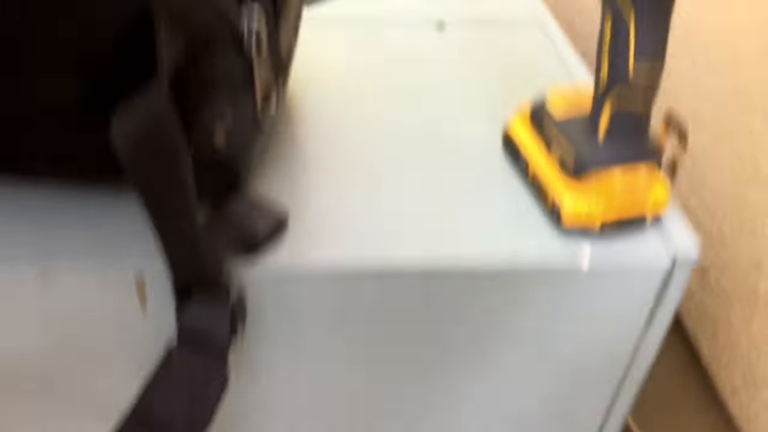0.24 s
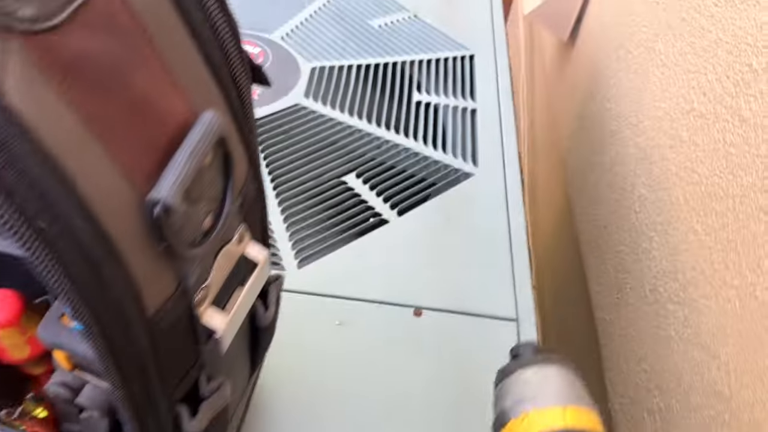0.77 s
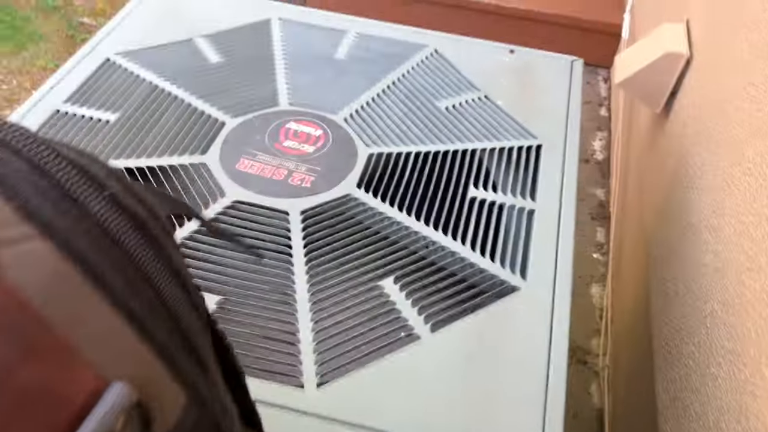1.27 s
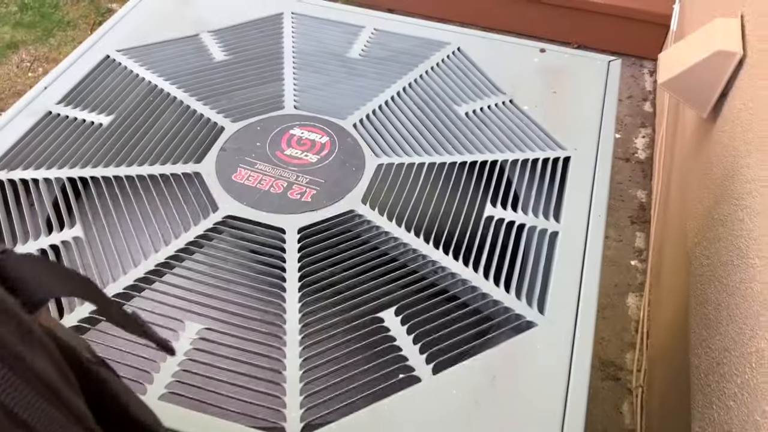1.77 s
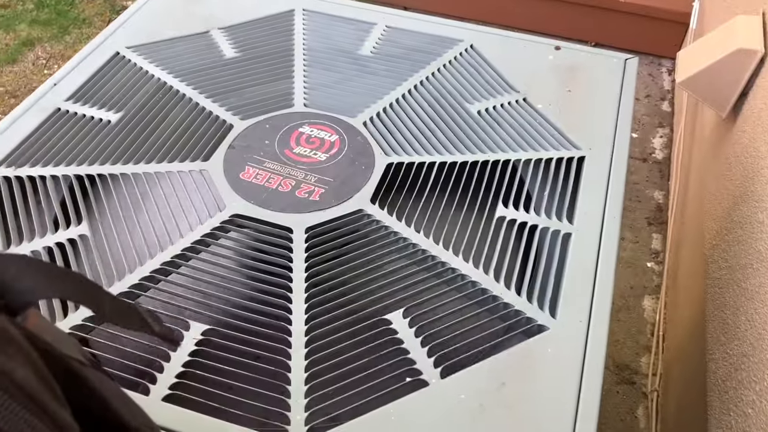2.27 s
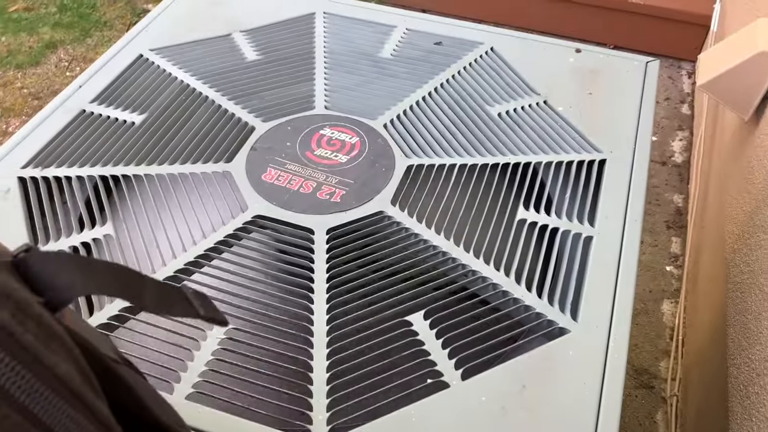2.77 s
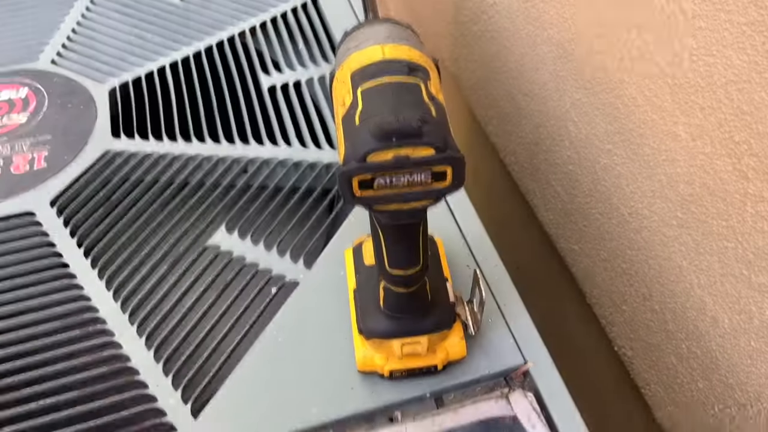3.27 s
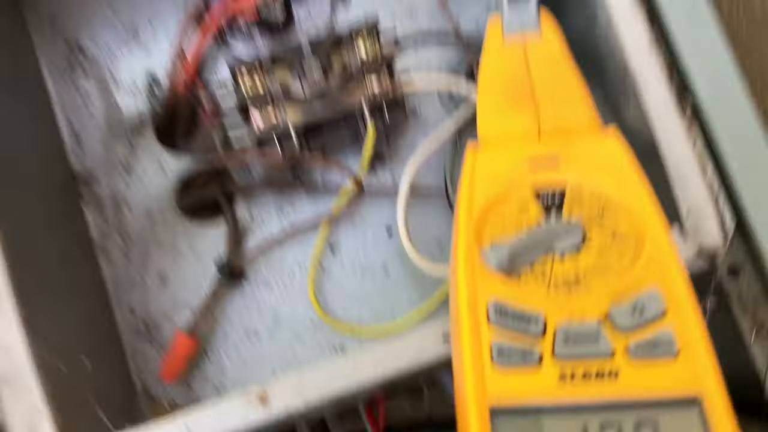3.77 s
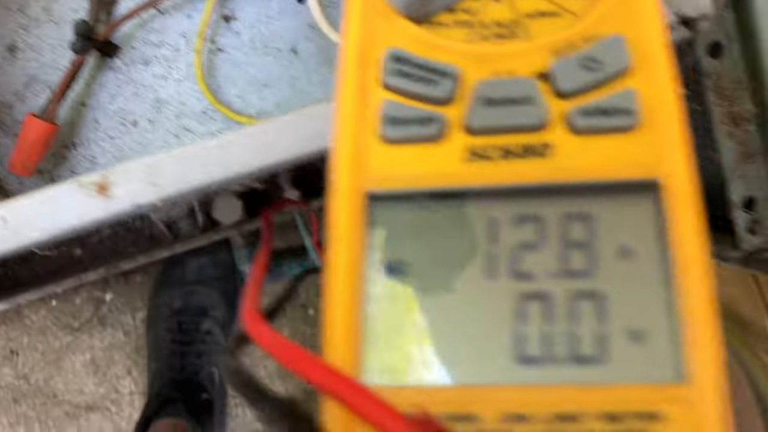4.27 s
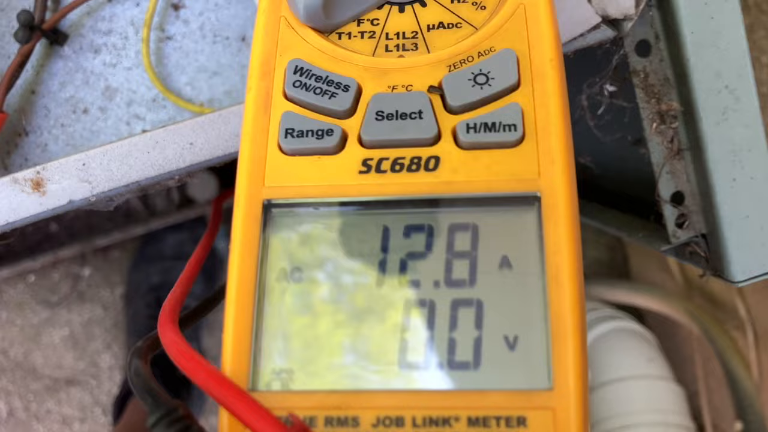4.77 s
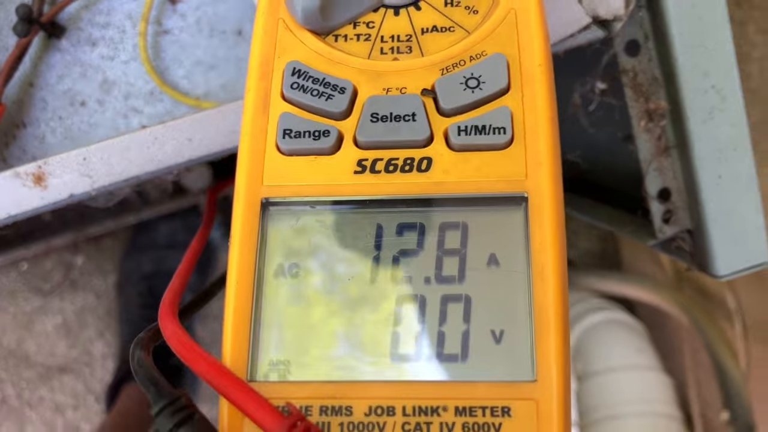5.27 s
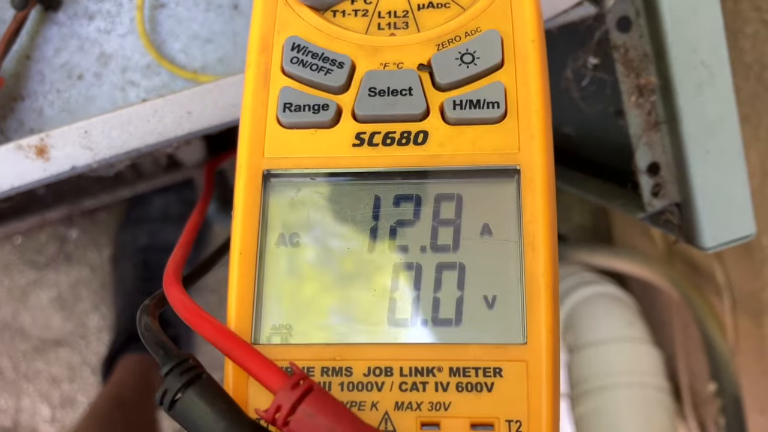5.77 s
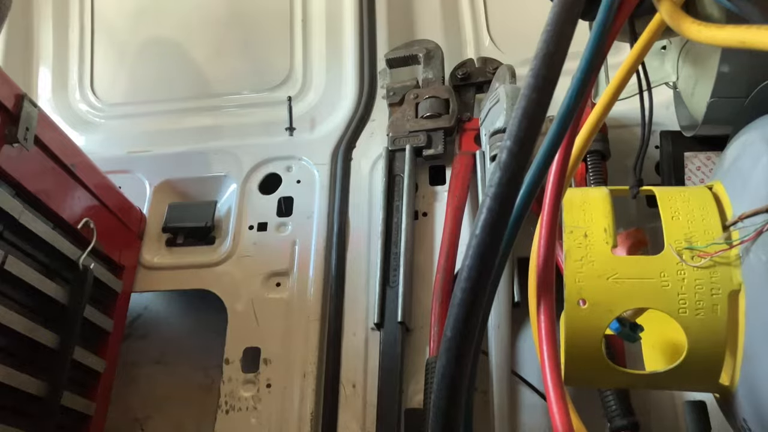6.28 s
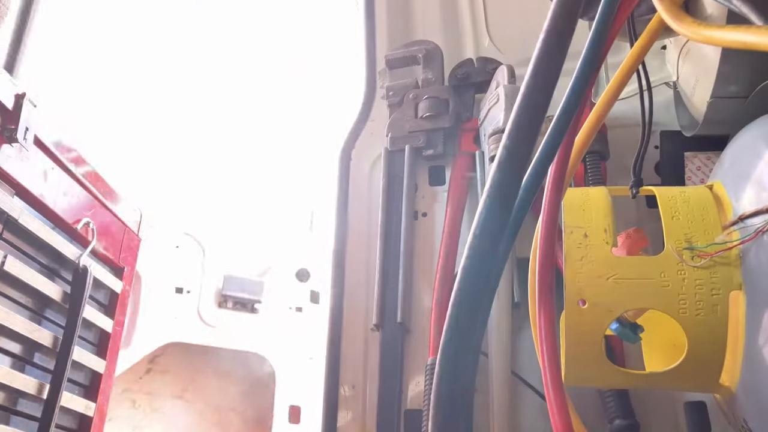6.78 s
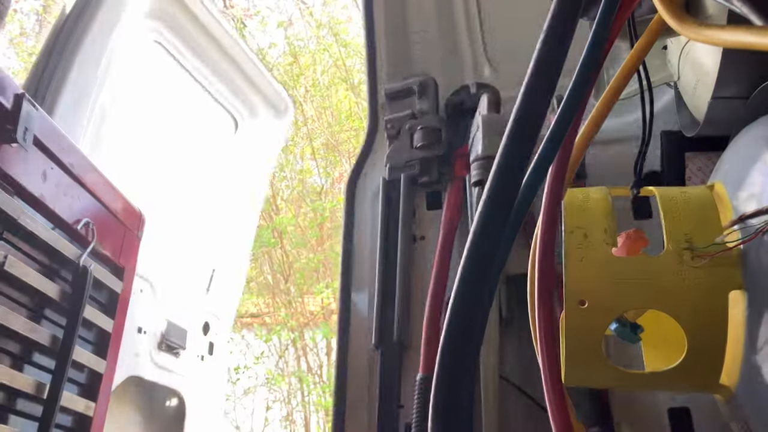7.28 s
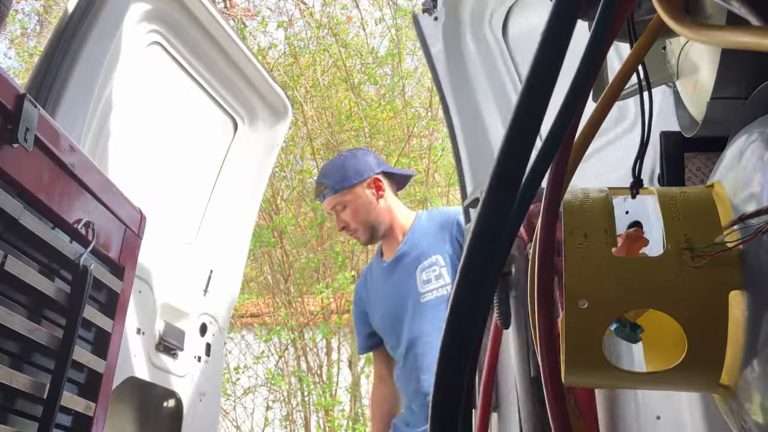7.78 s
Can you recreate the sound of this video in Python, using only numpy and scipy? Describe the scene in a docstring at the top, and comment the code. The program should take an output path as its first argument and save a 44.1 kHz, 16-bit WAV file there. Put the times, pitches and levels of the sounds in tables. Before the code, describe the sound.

Handheld stereo microphone moving close over a condenser: low buffeting air, fluttering blade rush and electrical hum, a few sharp little ticks and wind thumps. Then nearer the compressor, a thin metallic whine shifts in pitch colour amid pulsing hiss. An abrupt cut leads into a parked van, its rear doors unlatching with hollow metal clunks, swinging open with rough groans and creaks, a metallic snap, and low air fading away.

```python
"""Outdoors at an air-conditioning condenser, then, at six seconds, inside a parked van.
Over the fan grille: shaped noise for rumble and blade-chopped rush, sines for hum, bursts for tool-bag ticks.
At the open service panel: shaft-order combs for the compressor whine, over softer fan air and pulsing hiss.
In the van: noise bursts and decaying panel modes for the rear doors, which unlatch, knock and swing open
with a groan; a low murmur drains away."""
import sys
import numpy as np
from scipy import signal
from scipy.fft import rfft, irfft, next_fast_len
from scipy.io import wavfile
from scipy.ndimage import uniform_filter1d

SR = 44100
rng = np.random.default_rng(int(sys.argv[2]) if len(sys.argv) > 2 else 0)


def dump_mix(stems):
    """Bounce the given channels to the path in sys.argv[1] as a 16-bit WAV at rate SR."""
    frames = np.atleast_2d(stems).T  # one column per channel
    limited = np.clip(frames, -1, 1)  # hard clip at full scale
    pcm = np.round(limited * 32767).astype(np.int16)
    wavfile.write(sys.argv[1], SR, pcm)


N = 354299
T = np.arange(N) / SR

GRILLE_END_S, PANEL_START_S, VAN_START_S = 2.915, 2.948, 6.013
BLADE_HZ, SHAFT_HZ = 29.1, 58.787
TOP_HZ = 16000
EAR_LAG_S = .000262

# two-microphone likeness of the air: freq_hz, correlation
LIKENESS = [(25, .93), (130, 1), (260, 0.94), (420, 0.43), (900, 0.54), (1500, 0.022), (5000, 0.16),
            (7500, 0.77), (9000, 0.94)]

# air colour over the grille: freq_hz, relative_db
GRILLE_COLOUR = [(25, -21.5), (38, -8.5), (52, -4), (90, 1.5), (160, 0.5), (250, -6.5), (370, -18.5),
                 (600, -20), (900, -21.5), (1250, -25.5), (2000, -28.5), (3200, -33.5), (7500, -38),
                 (11000, -42.5), (16000, -49.5)]
GRILLE_RUMBLE_DB, GRILLE_RUSH_DB, GRILLE_HISS_DB = -23.5, -35, -47.5
# level change at full shelter by lid and tool bag
SHELTER_RUMBLE_DB, SHELTER_RUSH_DB, SHELTER_HISS_DB = -2.5, -6.5, -7
# path over the fan: time_s, shelter (1 behind the bag, 0 in the open draught)
SHELTER = [(0.65, 0.64), (1.2, 0.26), (1.8, 0.0068), (2.9, 0.14)]
# louvre colour under blade gusts: freq_hz, relative_db
GUST_COLOUR = [(500, -6), (900, 1.5), (1060, -1.5), (1220, 3.5), (1600, -12), (1950, -8.5), (2800, -19)]
GUST_DB, GUST_SHELTER_DB, GUST_SCATTER_DB, GUST_SHARPNESS = -39.5, -13.5, 4, 1.8
# gusts that stand out: time_s, relative_db
HARD_GUSTS = [(1.442, 5.5), (1.786, 6), (2.268, 3)]
# fan, motor and mains tones: freq_hz, grille_relative_db, panel_relative_db
HUM_TONES = [(58.3, -32, -37), (87.3, -39, -43), (117.0, -31, -37), (119.9, -24.5, -36), (239.8, -33, -37),
             (299.8, -48, -62), (352.7, -58, -49), (411.5, -58, -50), (470.3, -60, -54), (587.9, -62, -49),
             (651.0, -51, -66), (823.0, -56, -55), (1175.7, -70, -58), (1234.5, -62, -58),
             (1352.1, -66, -59)]
# beating upper tone of the fan motor
THROB_HZ, THROB_DB, THROB_SHELTER_DB = 475.6, -43, -21
THROB_PER_S, THROB_PEAK_S, THROB_DEPTH = 3.0, 1.867, 0.97
# eddies on the microphone: time_s, level_db
BUFFETS = [(2.626, -15), (2.685, -20), (2.86, -23), (3.225, -22)]
BUFFET_WIDTH_S = 0.014
# buckles and zip pulls of the tool bag: time_s, relative_db
TICKS = [(1.63, -41), (2.042, -28.5), (2.5, -20.5), (2.517, -26.5)]
# modes of a small steel ring on the strap: freq_hz, level_db
STRAP_RING = [(12100, -47), (15350, -49)]

# air colour beside the panel: freq_hz, relative_db
PANEL_COLOUR = [(25, -9), (38, -19), (52, -5.5), (90, -0.5), (130, -2), (200, -1), (330, -13), (430, -8),
                (560, -15.5), (820, -17.5), (1000, -22), (1300, -23), (1600, -28), (3200, -30.5),
                (4600, -27.5), (5180, -26.5), (5500, -31.5), (6050, -26), (7000, -36), (16000, -34)]
PANEL_RUMBLE_DB, PANEL_RUSH_DB, PANEL_HISS_DB, HISS_FADE_DB_PER_S = -26.5, -36, -43, 0.8
# path down to the panel: time_s, place (0 above, 1 between, 2 in front)
DESCENT = [(3.42, 0), (3.6, 1), (3.88, 1), (4.25, 2)]
# lifted orders at each place, snapped to the nearest shaft order: freq_hz, relative_db
WHINE_ABOVE = [(2234, -61), (2412, -58), (4118, -60), (4527, -55), (4705, -58), (4821, -64), (5173, -60),
               (6408, -61), (6525, -57), (6761, -54.5)]
WHINE_BETWEEN = [(2293, -56.5), (2762, -58), (4527, -57), (4646, -58), (4821, -57), (5997, -61),
                 (6471, -58), (6648, -60), (6939, -59), (7058, -58)]
WHINE_FRONT = [(2234, -53), (2293, -57.5), (2353, -58), (2821, -61), (2998, -64), (4468, -63.5),
               (4527, -55.5), (4587, -62), (5114, -60), (5233, -67), (5938, -64), (5997, -58), (6465, -62),
               (6939, -59)]
# two shell resonances, as the microphone crosses their standing waves: time_s, main_db, upper_db
RING_LEVELS = [(2.97, -48.5, -47), (3.3, -48, -50), (3.42, -46, -55), (3.52, -51, -56), (3.59, -64, -47),
               (3.67, -48, -58), (3.85, -59, -51), (3.93, -54, -47), (4.02, -51, -53), (4.17, -47, -61),
               (4.85, -47, -56), (5.4, -49.5, -64), (6.0, -55, -64)]

# blows on the van doors: time_s, ring_db, thump_db, clack_relative_db, hiss_relative_db,
# main_favoured_hz, second_favoured_hz, swell_s, ring_time_share, clatter_t60_s
KNOCKS = [(6.024, -35, -41, -53, -63, 283, 170, 0.0086, 0.73, 0.13),
          (6.074, -36.5, -43, -56, -67, 170, 340, .008, .8, 0.35),
          (6.268, -19, -28, -33.5, -47, 272, 142, 0.0065, 0.53, 0.088),
          (6.318, -29.5, -37, -54, -66, 66, 272, .008, .6, .12),
          (6.368, -34, -50, -57, -56.5, 275, 135, .006, .9, 0.15),
          (6.574, -32, -28.5, -36, -50.5, 272, 510, .004, .6, 0.15),
          (6.583, -18, -39, -54, -54, 134, 364, 0.016, 0.71, .13),
          (6.717, -30.5, -40.5, -55.5, -69, 66, 134, 0.012, 0.62, 0.13),
          (6.799, -52, -58, -49.5, -62.5, 134, 190.3, .006, .8, 0.071),
          (6.876, -30, -42.5, -52, -74, 195, 428, 0.006, 0.4, .11),
          (7.049, -16, -28, -36.5, -52.5, 162, 150, 0.022, 0.46, 0.15),
          (7.052, -23, -36, -52, -62, 275, 413, .004, .7, .1),
          (7.076, -36, -41, -42, -49, 270, 410, .006, 0.86, 0.14),
          (7.162, -26, -30, -48, -66, 134, 275, 0.008, 0.76, 0.15)]
LATCH_HZ, REBOUNDS_PER_S, REBOUND_SMEAR = 1830, 230, 0.19
# door panel modes: freq_hz, relative_db, free_t60_s
DOOR_MODES = [(66.7, -6.5, 0.62), (134.8, -0.5, 0.31), (168.4, 1.5, 0.2), (192.4, 0, 0.33),
              (271.5, 1.5, 0.19), (345, -4.5, 0.39), (416.4, -1, 0.26), (508, -1, 0.19), (600, -19, 0.37),
              (670, -7, 0.19), (826, -10, 0.2)]
# latch clatter colour: freq_hz, relative_db
CLATTER_COLOUR = [(300, -15), (520, 3), (680, -2), (820, 7.5), (980, 2.5), (1250, 2.5), (1550, -5.5),
                  (1950, -4.5), (2800, -12.5), (3700, -12), (5500, -16), (8200, -15.5), (16000, -19)]
# hinge stick-slip: time_s, clack_relative_db, hiss_relative_db, t60_s, clack_hz, groan_surge_db
SLIPS = [(7.135, -44, -46.5, 0.078, 1500, -30.5), (7.203, -42.5, -56, 0.081, 1100, -36),
         (7.256, -42.5, -47.5, 0.083, 750, -35), (7.304, -47, -60, 0.1, 1000, -31.5),
         (7.378, -48, -57, 0.17, 850, -33), (7.459, -50, -59, 0.1, 1150, -33),
         (7.539, -56, -68, .17, 900, -35.5), (7.58, -42.5, -59, 0.11, 1950, -44),
         (7.605, -54, -63, 0.17, 1100, -38.5)]
SURGE_LAG_S, SURGE_WIDTH_S = 0.025, 0.011
SWING_START_S, SWING_END_S = 7.13, 7.8
GROAN_HZ, GROAN_SAG_HZ_PER_S, GROAN_DB, GROAN_FADE_DB_PER_S = 340, 45, -44.5, 6.5
CREAK_END_S, CREAK_DB, CREAK_PER_S, CREAK_SCATTER_DB = 7.67, -57.5, 250, 6
# door stay colour: freq_hz, relative_db
STAY_COLOUR = [(500, 3), (2500, -7), (3300, -2), (3750, 2), (4300, 1), (5000, -11), (6300, -10),
               (8500, -2.5), (11000, -7), (16000, -7)]
# door stay modes: freq_hz, relative_db, t60_s
STAY_MODES = [(2950, -17, .16), (3402, -6, .1), (3735, -4.5, 0.098), (4200, -11, .1), (7402, -16, .13)]
# rods and seals sliding: start_s, end_s, rub_db, panel_relative_db
SCRAPES = [(6.157, 6.205, -78, -45), (6.211, 6.269, -53, -41), (6.29, 6.383, -58, -50),
           (6.56, 6.578, -52, -54), (6.93, 7.06, -60, -53), (7.08, 7.333, -54, -41.5)]
# still-air colour in the van: freq_hz, relative_db
VAN_COLOUR = [(25, -4), (60, 6), (190, 4.5), (330, 3), (560, -9.5), (1200, -19.5), (3000, -36),
              (8000, -40.5), (16000, -44)]
VAN_AIR_DB, DOOR_OPEN_S, DRAIN_DB_PER_S = -52, 7.73, 45
BOOM_RE_THUMP_DB, BOOM_T60_S = -4, 0.56


def undb(db):
    """Decibels to gain."""
    return 10 ** (np.asarray(db) / 20)


def unit(x):
    """Scale to rms 1."""
    return x / np.sqrt(np.mean(x ** 2))


def curves(table):
    """Each column of a timed table, joined by straight lines."""
    time_s, *columns = np.transpose(table)
    return [np.interp(T, time_s, column) for column in columns]


def walk(rate_hz, size=N):
    """Smooth random drift with a spread near 1."""
    hold = max(int(SR / rate_hz), 2)
    steps = np.repeat(rng.standard_normal(size // hold + 1), hold)
    return 1.56 * uniform_filter1d(uniform_filter1d(steps, hold), hold)[:size]


def noise(colour, lo_hz, hi_hz, size=N, ripple_db=0):
    """One band of coloured stereo noise at rms 1; ripple stands for many close resonances."""
    n = next_fast_len(size)
    f = np.maximum(np.arange(n // 2 + 1) * SR / n, 1)
    colour_hz, colour_db = np.transpose(colour)
    alike_hz, correlation = np.transpose(LIKENESS)
    db = np.interp(np.log(f), np.log(colour_hz), colour_db)
    alike = np.clip(np.interp(np.log(f), np.log(alike_hz), correlation), -1, 1)
    knots_hz = np.arange(0, SR / 2, 130)
    db = db + ripple_db * np.interp(f, knots_hz, rng.standard_normal(len(knots_hz)))
    gain = undb(db) / np.sqrt((1 + (lo_hz / f) ** 12) * (1 + (f / hi_hz) ** 12))
    # mid/side balance sets the correlation
    mid, side = rfft(rng.standard_normal((2, n))) * gain * np.sqrt([1 + alike, 1 - alike])
    return unit(irfft(np.array([mid + side, mid - side]), n)[:, :size])


def pan(db):
    """Left and right gains for a left-over-right level difference."""
    return undb(np.array([[db], [-db]]) / 2)


def between(start_s, end_s, rise_s, fall_s):
    """A window with sloping edges, centred on start and end."""
    rise = np.clip((T - start_s) / rise_s + .5, 0, 1)
    return rise * np.clip((end_s - T) / fall_s + .5, 0, 1)


def fade(t, attack_s, t60_s):
    """Envelope of a blow: exponential attack and decay."""
    return (1 - np.exp(-t / attack_s)) * np.exp(-np.log(1000) * t / max(t60_s, .005))


def add(out, time_s, sound):
    """Mix a sound in at a time."""
    i = int(time_s * SR)
    out[:, i:i + sound.shape[-1]] += sound[..., :N - i]


def delay_left_treble(sound, lag_s):
    """The treble arrives later at the left microphone (earlier if negative); the bass stays in step."""
    n = next_fast_len(N + SR // 10)
    f = np.arange(n // 2 + 1) * SR / n
    lag = lag_s * np.clip(f / 2500, 0, 1) ** 2
    left = irfft(rfft(sound[0], n) * np.exp(-2j * np.pi * f * lag), n)[:N]
    return np.array([left, sound[1]])


def grille():
    """Over the fan: buffeting rumble, a rush chopped at the blade rate, smoother hiss and hum."""
    shelter, = curves(SHELTER)
    rumble_db = GRILLE_RUMBLE_DB + SHELTER_RUMBLE_DB * shelter + 1.42 * walk(11.99)
    rush_db = GRILLE_RUSH_DB + SHELTER_RUSH_DB * shelter + 1.3 * walk(44.62)
    hiss_db = GRILLE_HISS_DB + SHELTER_HISS_DB * shelter + .5 * walk(8.9)
    rumble = noise(GRILLE_COLOUR, 18, 388) * undb(rumble_db) * pan(-0.61)
    rush = noise(GRILLE_COLOUR, 387, 2660) * undb(rush_db) * blade_chop(depth=0.14) * pan(3.1)
    hiss = noise(GRILLE_COLOUR, 2840, 17000) * undb(hiss_db) * blade_chop(depth=0.11) * pan(-0.65)
    # the flat steel lid drones only while it is close
    lid = undb(-34.5) * noise(GRILLE_COLOUR, 320, 384) * between(-1, 0.37, .01, 0.34)
    tones = throb(shelter) + undb(0.7) * hum(column=1, waver_db=1.94, drift_rad=0.56)
    return rumble + rush + gusts(shelter) + hiss + lid + tones


def blade_chop(depth):
    """The air flow pulses with each passing blade."""
    return unit(1 + depth * (1 + 0.32 * walk(11.8)) * np.cos(2 * np.pi * BLADE_HZ * T))


def gusts(shelter):
    """Each blade throws a gust of its own strength through the louvres; strongest in the open draught."""
    blade = np.rint(BLADE_HZ * T).astype(int)
    strength = undb(GUST_SCATTER_DB * rng.uniform(-1.1, 1, blade[-1] + 1))[blade]
    puffs = unit(strength * np.exp(GUST_SHARPNESS * np.cos(2 * np.pi * BLADE_HZ * T)))
    puffs = puffs + sum(2 * undb(db) * np.exp(-((T - s) / 0.0037) ** 2) for s, db in HARD_GUSTS)
    return noise(GUST_COLOUR, 320, 3000) * puffs * undb(GUST_DB + GUST_SHELTER_DB * shelter) * pan(3)


def throb(shelter):
    """An upper tone of the fan motor beats slowly; shelter weakens it strongly."""
    beat = 1 + THROB_DEPTH * np.cos(2 * np.pi * THROB_PER_S * (T - THROB_PEAK_S))
    tone = np.sin(2 * np.pi * THROB_HZ * T + .5 * walk(25))
    return undb(THROB_DB + THROB_SHELTER_DB * shelter) * beat * tone * pan(2)


def hum(column, waver_db, drift_rad):
    """Motor and mains tones, wavering in the turbulent air."""
    out = 0
    for row in HUM_TONES:
        hz = row[0]
        phase = 2 * np.pi * (hz * T + rng.random()) + drift_rad * walk(3.955)
        ear_phase = np.array([[0], [rng.normal() * hz / 600]])
        gain = undb(row[column] + waver_db * walk(5.99)) * np.sqrt(2)
        out = out + gain * np.sin(phase + ear_phase)
    return out


def panel():
    """At the service panel: softer fan air, compressor whine and gas hiss that pulses with the shaft."""
    turns = SHAFT_HZ * T + .0007 * walk(14) + .0005 * walk(70)
    rumble = noise(PANEL_COLOUR, 18, 310) * undb(PANEL_RUMBLE_DB + 0.76 * walk(14))
    rush = noise(PANEL_COLOUR, 388, 2900) * undb(PANEL_RUSH_DB + 1.22 * walk(35))
    rush = rush * blade_chop(depth=0.15) * pan(3.6)
    # the hiss fades as the microphone sinks below the grille
    hiss_db = PANEL_HISS_DB - HISS_FADE_DB_PER_S * (T - PANEL_START_S)
    shaft_pulse = 1 + 0.17 * np.sin(2 * np.pi * turns) + 0.12 * np.sin(4 * np.pi * turns)
    hiss = noise(PANEL_COLOUR, 2270, 13000) * undb(hiss_db) * shaft_pulse
    place, = curves(DESCENT)
    main_db, upper_db = curves(RING_LEVELS)
    rings = undb(main_db) * shell_ring(turns, hz=3513, width_hz=43, flutter_db=1.5, ear_phase_rad=1.3)
    rings = rings + undb(upper_db) * shell_ring(turns, hz=4880, width_hz=36, flutter_db=1.5, ear_phase_rad=1.3)
    whine = 0
    for k, strong in enumerate([WHINE_ABOVE, WHINE_BETWEEN, WHINE_FRONT]):
        nearness = np.sqrt(np.clip(1 - abs(place - k), 0, 1))
        whine = whine + nearness * compressor(turns, strong, weak_db=-76.5) * undb(1.58 * walk(18))
    air = delay_left_treble(rumble + rush + hiss, EAR_LAG_S)
    return air + whine + rings + undb(0.5) * hum(column=2, waver_db=1.85, drift_rad=0.15)


def compressor(turns, strong, weak_db, size=4096):
    """Every shaft turn repeats the same gas chatter: a comb of weak orders, a few lifted by the shell."""
    orders = np.arange(24, 138)
    db = np.full(size // 2 + 1, -200.)
    db[orders] = weak_db + 3 * rng.standard_normal(len(orders))
    for hz, line_db in strong:
        db[int(round(hz / SHAFT_HZ))] = line_db
    # neighbouring orders share a resonance, struck at its own moment of the turn, so the whine flutters
    group = np.arange(len(db)) // 7
    moment, standing_wave = rng.random((2, len(db)))[:, group]
    # the microphones stand at different places in the standing waves round the shell
    phase = 2 * np.pi * np.cumsum(moment) + np.array([[0], [np.pi]]) * (standing_wave - .5)
    cycles = irfft(undb(db) * size / np.sqrt(2) * np.exp(1j * phase))
    angle = np.arange(size) / size
    return np.array([np.interp(turns % 1, angle, cycle) for cycle in cycles])


def shell_ring(turns, hz, width_hz, flutter_db, ear_phase_rad, size=4096):
    """A shell resonance struck once a turn at uneven strength: it throbs on the nearest shaft orders."""
    orders = round(hz / SHAFT_HZ) + np.arange(-3, 4)
    angle = np.arange(size) / size
    cycle = 0
    for k in orders:
        response = 1 / (1 + 1j * (k * SHAFT_HZ - hz) / width_hz) ** 2
        cycle = cycle + np.exp(2j * np.pi * k * angle) * response
    ring = np.interp((turns + rng.random()) % 1, angle, cycle)
    ears = np.real(ring * np.exp(1j * np.array([[0], [ear_phase_rad]])))
    return unit(ears * undb(flutter_db * walk(59)))


def doors():
    """Latch and rods clatter; the sheet-metal panel swells a moment later and rings on; the van booms."""
    out, t = np.zeros((2, N)), T[:SR]
    for (s, ring_db, thump_db, clack_db, hiss_db,
         main_hz, second_hz, swell_s, ring_share, clatter_s) in KNOCKS:
        thump = noise(VAN_COLOUR, 45, 570, size=len(t)) * fade(t, 0.0046, 0.3)
        boom = noise(VAN_COLOUR, 30, 800, size=len(t)) * fade(t, 0.026, BOOM_T60_S)
        low = undb(thump_db) * (thump + undb(BOOM_RE_THUMP_DB) * boom)
        ring = undb(ring_db) * door_ring(t, main_hz, second_hz, swell_s, ring_share)
        add(out, s, ring + low + clatter(t, clack_db, hiss_db, clatter_s, LATCH_HZ))
    return out


def door_ring(t, main_hz, second_hz, swell_s, ring_share):
    """Sheet metal swells and rings on, peak 1; the place of the blow favours modes near two pitches."""
    body = 0
    for hz, db, free_s in DOOR_MODES:
        main_lift_db = 16 * np.exp(-(np.log(hz / main_hz) / 0.18) ** 2)
        second_lift_db = 14 * np.exp(-(np.log(hz / second_hz) / 0.17) ** 2)
        phase = 2 * np.pi * (hz * (1 + 0.0053 * rng.normal()) * t + rng.random())
        gain = undb(db + main_lift_db + second_lift_db)
        body = body + gain * fade(t, swell_s, free_s * ring_share) * np.sin(phase)
    body = body * (1 - np.exp(-t / swell_s))
    return body / np.abs(body).max()


def clatter(t, clack_db, hiss_db, t60_s, ring_hz):
    """Steel parts meet and rebound in quick uneven contacts: a clack round one pitch, and a bright hiss."""
    contacts = (rng.random(len(t)) < REBOUNDS_PER_S / SR) * rng.uniform(.2, 1, len(t))
    contacts[0] = 1
    rebounds = signal.fftconvolve(contacts, fade(t[:SR // 20], .0003, 0.02))[:len(t)]
    grain = np.sqrt(REBOUND_SMEAR + np.abs(rebounds))
    ring = undb(-6.5) * noise(CLATTER_COLOUR, .85 * ring_hz, 1.15 * ring_hz, size=len(t))
    clack = noise(CLATTER_COLOUR, 370, 2770, size=len(t), ripple_db=4.0) + ring
    clack = clack * fade(t, 0.0041, t60_s) * pan(-4.0)
    hiss = noise(CLATTER_COLOUR, 2240, 20000, size=len(t), ripple_db=2.5) * fade(t, 0.0016, t60_s)
    return 2 * grain * (undb(clack_db) * clack + undb(hiss_db + 1.5) * hiss)


def swing(stay_s, stay_db):
    """Each hinge slip clicks and makes the panel groan in a surge; late on the door stay snaps home."""
    out, t = np.zeros((2, N)), T[:SR // 3]
    since_s = np.maximum(T - SWING_START_S, 0)
    push = undb(GROAN_DB - GROAN_FADE_DB_PER_S * since_s)
    push = push * between(SWING_START_S, SWING_END_S, 0.057, 0.15)
    surge = 0
    for s, clack_db, hiss_db, t60_s, clack_hz, surge_db in SLIPS:
        add(out, s, clatter(t, clack_db, hiss_db, t60_s, clack_hz))
        surge = surge + undb(surge_db) * np.exp(-((T - s - SURGE_LAG_S) / SURGE_WIDTH_S) ** 2)
    phase = 2 * np.pi * np.cumsum(GROAN_HZ - GROAN_SAG_HZ_PER_S * since_s) / SR
    rough_tone = unit(walk(230) * np.sin(phase) + walk(230) * np.cos(phase))
    groan = push * rough_tone + surge * np.sin(phase + 0.62 * walk(120))
    shudder = undb(-2.0) * push * noise(VAN_COLOUR, 38, 1500)
    add(out, stay_s, undb(stay_db) * stay_snap(t))
    return out + groan * pan(.5) + shudder


def stay_snap(t):
    """The steel door stay snaps home: a bright crack and a short ring."""
    crack = noise(STAY_COLOUR, 500, 17000, size=len(t), ripple_db=3.5) * fade(t, 0.003, 0.12)
    ring = 0
    for hz, db, t60_s in STAY_MODES:
        phase = 2 * np.pi * (hz * t + rng.random((2, 1)))
        ring = ring + undb(db) * fade(t, 0.0025, t60_s) * np.sin(phase)
    return (crack + ring) * pan(-1)


def creak():
    """The dry hinge grinds on under its slips, in dense uneven catches."""
    scatter_db = CREAK_SCATTER_DB * np.clip(rng.standard_normal(N), -2, 2)
    catches = (rng.random(N) < CREAK_PER_S / SR) * undb(scatter_db)
    grain = unit(signal.fftconvolve(catches, fade(T[:SR // 10], .0005, 0.026))[:N])
    window = between(SWING_START_S, CREAK_END_S, .03, 0.14)
    return noise(CLATTER_COLOUR, 420, 3000) * grain * undb(CREAK_DB) * window * pan(-2)


def squeak(start_s, end_s, from_hz, to_hz):
    """The handle rubs its pivot: a short thin whistle that sags as the latch gives."""
    progress = np.clip((T - start_s) / (end_s - start_s), 0, 1)
    hz = from_hz + (to_hz - from_hz) * progress ** 2
    phase = 2 * np.pi * np.cumsum(hz * (1 + 0.0069 * walk(600))) / SR
    tone = undb(-37.5) * np.sin(phase) + undb(-73) * np.sin(2 * phase)
    return tone * undb(1.0 * walk(200)) * between(start_s, end_s, 0.022, 0.032)


def scrape(start_s, end_s, rub_db, body_db):
    """Latch rods and door seals slide with a faint grainy rub that also stirs the panel."""
    rub = undb(rub_db + 2.6 * walk(380)) * noise(CLATTER_COLOUR, 400, 17000, ripple_db=3.0)
    body = undb(body_db) * noise(VAN_COLOUR, 90, 640)
    return (rub + body) * between(start_s, end_s, 0.014, 0.019)


def bag(ring_s):
    """Small hard parts tick together, and a steel ring tinkles once."""
    out, t = np.zeros((2, N)), T[:SR // 8]
    colour = [(3500, -4.0), (5500, -10.0), (7500, -2.5), (11500, -3), (16000, -1.0)]
    for s, db in TICKS:
        decay = fade(t, 0.0004, 0.017) + undb(-18.5) * fade(t, .002, 0.14)
        add(out, s, undb(db + 4.5) * decay * noise(colour, 3600, 15200, size=len(t)))
    tinkle = sum(undb(db) * np.sin(2 * np.pi * hz * t) for hz, db in STRAP_RING)
    add(out, ring_s, fade(t, .001, 0.16) * tinkle)
    return out


def buffets():
    """Eddies of the draught thump the microphone."""
    bumps = sum(undb(db) * np.exp(-((T - s) / BUFFET_WIDTH_S) ** 2) for s, db in BUFFETS)
    return noise(GRILLE_COLOUR, 35, 140) * bumps


def van_air():
    """The shut van's low murmur drains away through the open door; a faint outdoor hiss comes in."""
    drain_db = DRAIN_DB_PER_S * np.maximum(T - DOOR_OPEN_S, 0)
    murmur = noise(VAN_COLOUR, 20, 17000) * undb(VAN_AIR_DB - drain_db + 0.52 * walk(14))
    outdoors = undb(-76.0) * noise(CLATTER_COLOUR, 3000, 17000) * (T > DOOR_OPEN_S)
    return murmur + outdoors


def scene():
    """Three places in turn; a short, faint bridge of air noise joins the first two."""
    over_fan = grille() * between(-1, GRILLE_END_S - .012, .01, 0.053) + bag(ring_s=.9)
    at_panel = panel() * between(PANEL_START_S, VAN_START_S, 0.014, 0.02)
    bridge = undb(-45.5) * noise(PANEL_COLOUR, 30, 12000)
    bridge = bridge * between(GRILLE_END_S, PANEL_START_S, 0.0092, .01)
    scrapes = sum(scrape(*row) for row in SCRAPES)
    van = doors() + swing(stay_s=7.649, stay_db=-31.5) + creak() + scrapes + van_air()
    handle = squeak(6.546, 6.572, from_hz=2376, to_hz=2250)
    condenser = delay_left_treble(over_fan, EAR_LAG_S) + buffets() + bridge + at_panel
    return condenser + delay_left_treble(van * (T > VAN_START_S), -EAR_LAG_S) + handle


def record(dry):
    """The recorder cuts the top: a steep elliptic low-pass."""
    return signal.sosfilt(signal.ellip(10, .2, 80, TOP_HZ, fs=SR, output="sos"), dry)


dry = scene()
out = record(dry)
dump_mix(out)
```